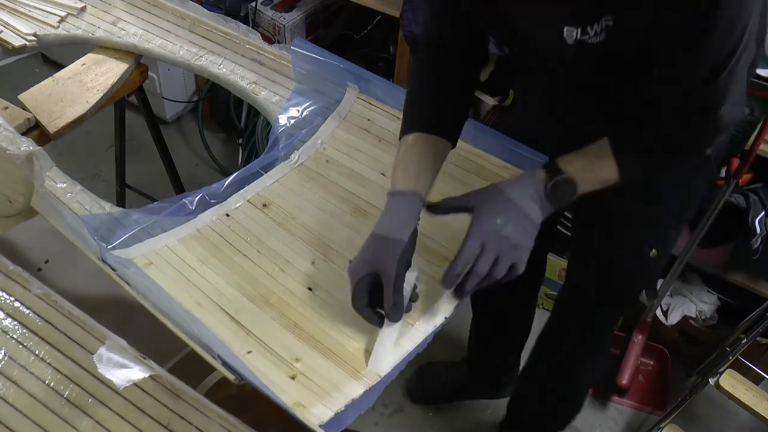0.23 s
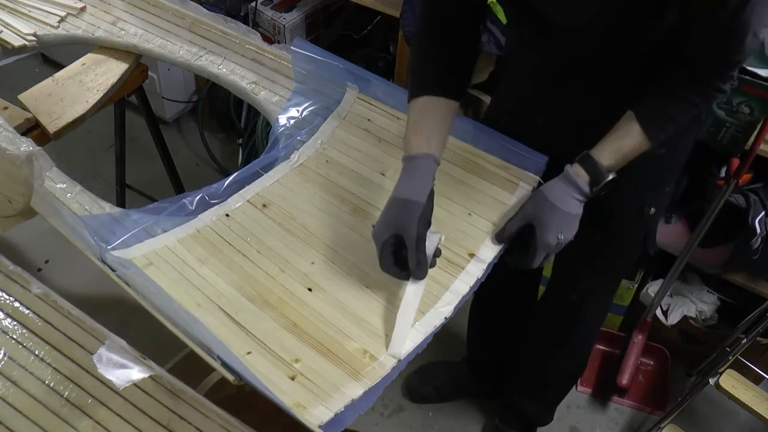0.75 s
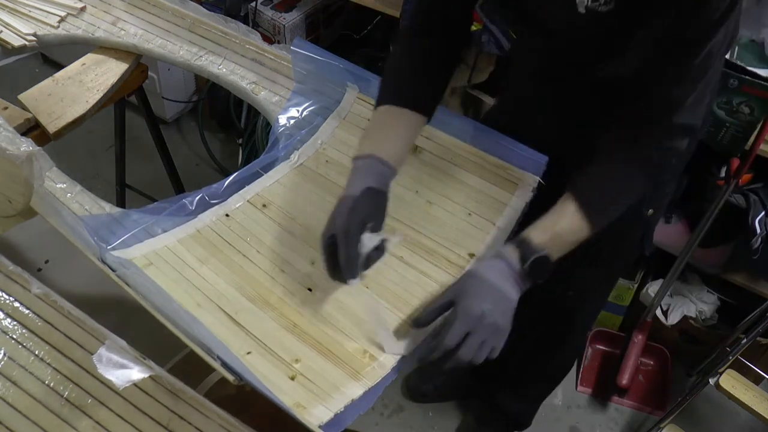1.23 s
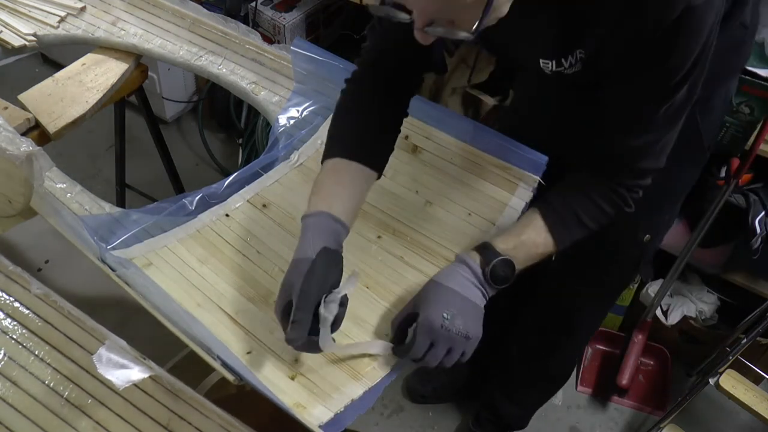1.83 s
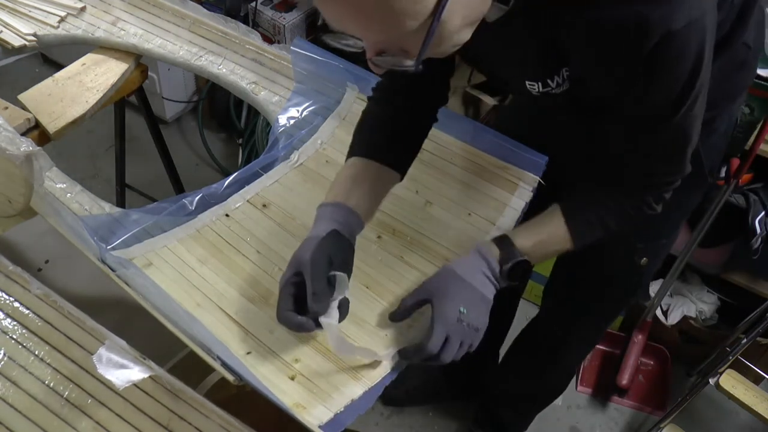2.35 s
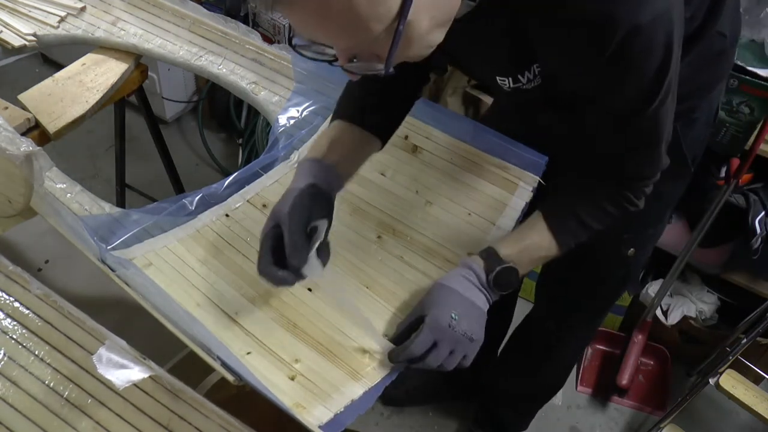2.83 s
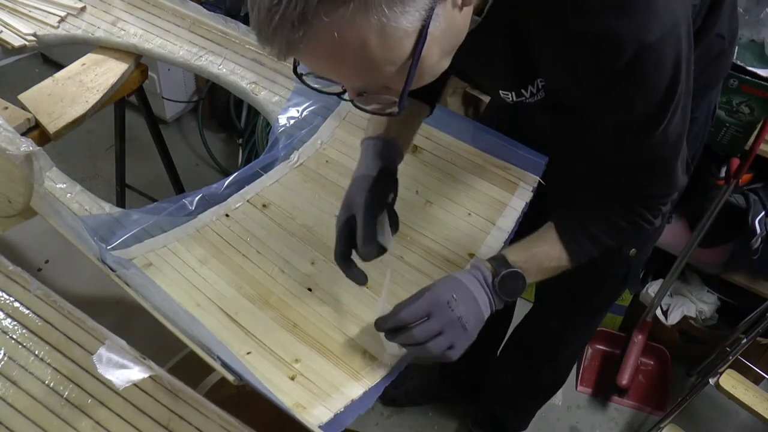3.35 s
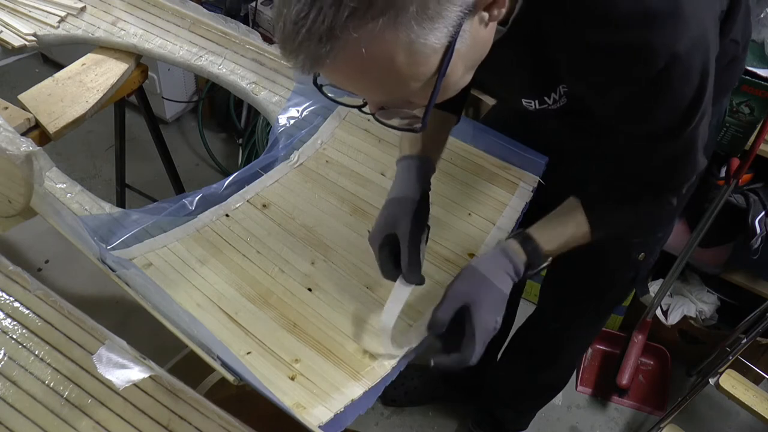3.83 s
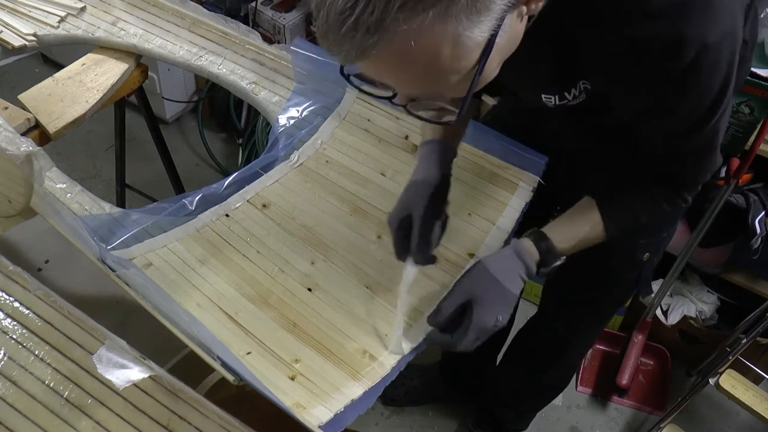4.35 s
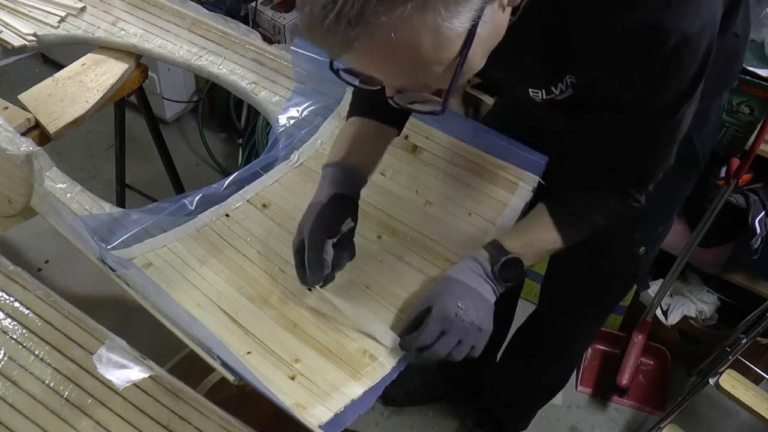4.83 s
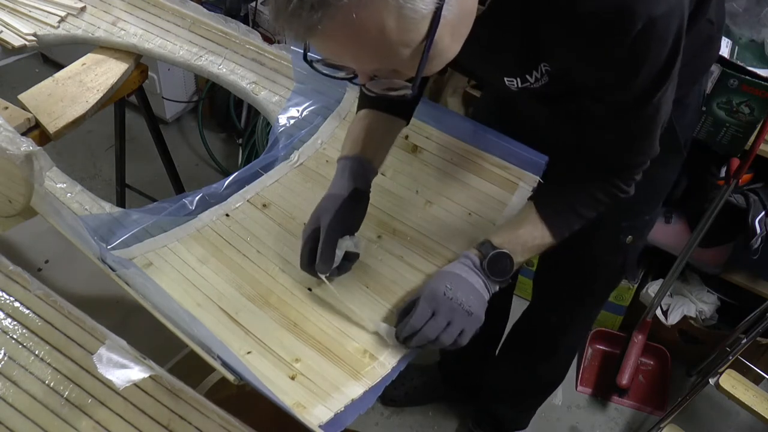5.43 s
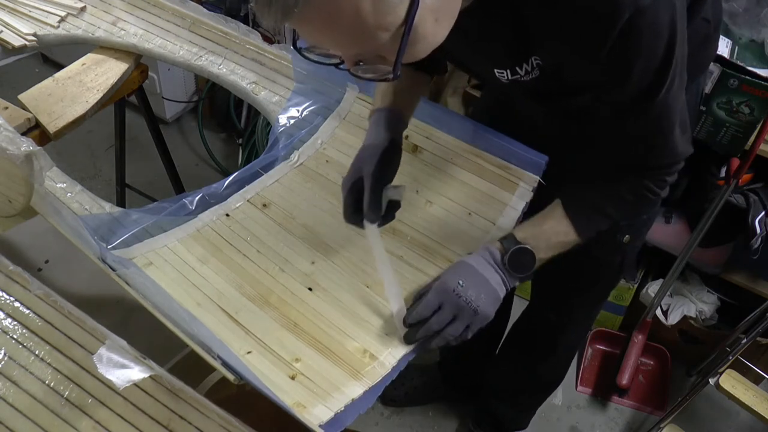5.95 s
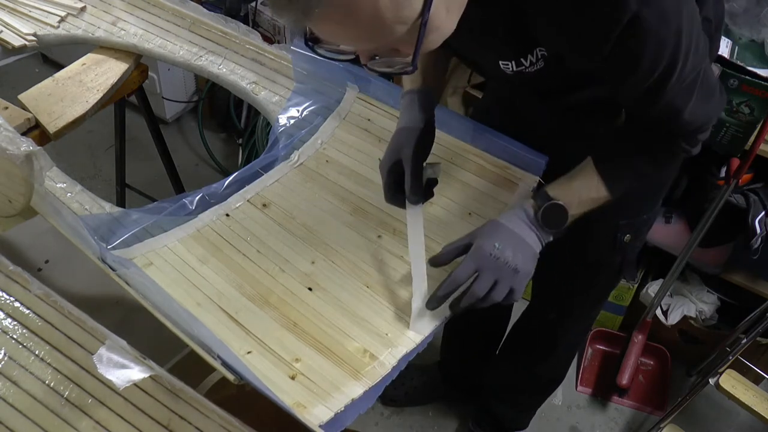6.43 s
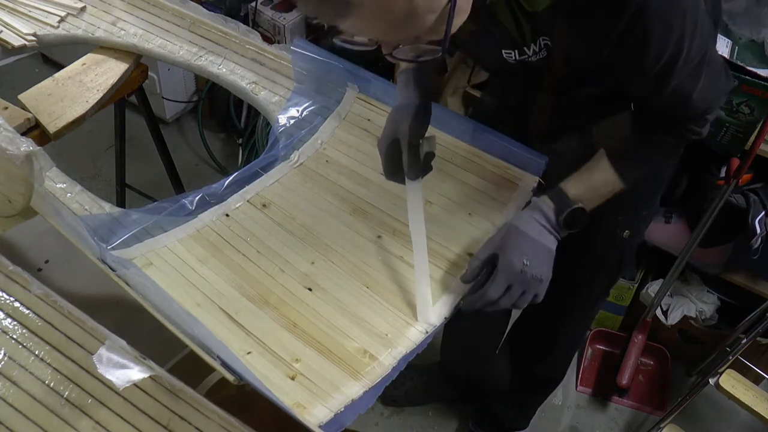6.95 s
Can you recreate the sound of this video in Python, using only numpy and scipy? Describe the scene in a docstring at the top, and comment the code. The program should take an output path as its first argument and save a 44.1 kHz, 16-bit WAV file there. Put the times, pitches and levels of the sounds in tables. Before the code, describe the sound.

Close stereo microphones catch gloved hands peeling masking tape from wood. A dense bright rip comes first, then little tugs made of tiny glue snaps, with dry crinkles and ticks. Low muffled rubs of glove on panel accompany them. There is a short lull midway, then more faint peeling and a hard, thumping snap late on. The small room dies away quickly over quiet hiss and a slowly beating low hum.

```python
"""Peeling tape off a wooden panel

Gloved hands peel masking tape off a glued panel in a small workshop: one long rip, then short pulls.
The glue lets go in a swarm of tiny random snaps; ticks of noise make the paper strip crinkle and crack.
Duller swarms are a glove rubbing the wood, and narrow bands of noise are its faint squeaks.
All of it bounces once off the panel and dies quickly in the room, over soft hiss and a faint, beating hum."""
import sys
import numpy as np
from scipy import signal
from scipy.fft import rfft, irfft
from scipy.io import wavfile
from scipy.ndimage import uniform_filter1d, map_coordinates

SR = 44100
rng = np.random.default_rng(int(sys.argv[2]) if len(sys.argv) > 2 else 0)


def int16_out(signal):
    """Quantize to a 16-bit WAV file."""
    q = np.round(np.clip(np.atleast_2d(signal).T, -1, 1) * 32767)
    wavfile.write(sys.argv[1], SR, q.astype(np.int16))


N = 317079
T = np.arange(N) / SR  # time of every sample, in seconds
FREQS = np.maximum(np.fft.rfftfreq(2 * N, 1 / SR), 1)  # in Hz, for filters on twice the length

# All source levels below are before the room.
# Pulls on the strip: start_s, rise_s, hold_s, level_db, body_db, top_db
# (body_db is the low-mid part and top_db the crisp part, both relative to level_db)
TAPE_PULLS = [(0.0, 0.0016, 0.015, -45, -20, -9.5), (0.036, 0.11, 0.12, -27, -18, -6.5),
              (0.401, 0.13, .07, -46.5, -19.5, -2), (0.692, 0.031, 0.05, -52.5, -12.5, -5),
              (0.947, 0.038, 0.021, -49, -23, -11.5), (1.193, .028, 0.0085, -39.5, -14.5, -7.5),
              (1.412, 0.029, 0.026, -52, -11.5, -10.5), (1.53, 0.0048, 0.037, -56, -23, -10.5),
              (1.635, 0.093, 0.01, -46, -23, -0.5), (1.79, .025, .03, -59, -20, -3),
              (1.889, 0.0087, 0.012, -54.5, -22, -5), (1.981, .125, 0.033, -45.5, -20, -7.5),
              (2.144, .082, .016, -40, -18, -3), (2.314, 0.023, 0.0072, -50.5, -17, -5),
              (2.414, .016, 0.019, -40, -13, -4.5), (2.786, 0.0044, 0.016, -59.5, -18, -6),
              (2.959, 0.011, .16, -64.5, -10, -10), (3.15, 0.013, 0.0054, -50, -18, -9),
              (3.341, 0.039, .011, -54, -20, -7), (3.505, 0.075, .045, -57.5, -16, -5.5),
              (3.633, 0.031, 0.0062, -50, -21, 3), (4.114, 0.0036, 0.0055, -47.5, -11.5, -4),
              (4.136, 0.033, 0.027, -50, -15, -5), (4.307, .008, 0.0044, -56, -16, -15),
              (4.553, .02, 0.071, -61, -14.5, -7.5), (4.648, 0.027, .06, -48, -13.5, -10.5),
              (4.784, 0.026, .13, -59, -19.5, -6), (5.021, 0.011, .045, -54, -23, -3),
              (5.099, 0.025, 0.011, -48.5, -20, -9), (5.193, .11, .01, -50, -19, -14.5),
              (5.383, 0.074, 0.22, -61, -11.5, -9), (5.916, 0.064, 0.0096, -59.5, -10.5, -0.5),
              (6.051, 0.19, .008, -48.5, -18, -2), (6.314, 0.078, 0.12, -53, -20, -4),
              (6.528, .006, .014, -45, -9.5, -1.5), (6.8, 0.026, .08, -64, -17.5, -5),
              (6.994, 0.0039, .19, -50, -17.5, 1)]
# Faint rustle of the slack strip between pulls: level_db, body_db, top_db (the last two relative)
SLACK_RUSTLE = (-66, -12, -11)
# Sound colour of the tape: freq_hz, density_db
TAPE_SPECTRUM = [(200, -21), (400, -27), (750, -15), (1200, -12), (1700, -2), (2400, 3), (4000, -2),
                 (7300, -3), (10000, -8.5), (13000, -18), (15800, -26)]
# Sound colour of the strip jerking free of a glued spot: freq_hz, density_db
JERK_SPECTRUM = [(40, -5), (90, -5.5), (170, 0.5), (400, -29), (750, -13), (1200, -8), (2200, 5),
                 (3600, -1), (6000, -2), (8100, -10), (11000, -6), (15800, -38)]
# Single cracks of paper and dried glue: start_s, peak_db, centre_hz
PAPER_CRACKS = [(0.0505, -20, 4300), (0.5527, -16, 4300), (0.7573, -30, 3900), (1.2191, -19, 4100),
                (1.3473, -36, 2500), (1.5419, -30, 3900), (2.0166, -28, 5700), (2.159, -27, 4000),
                (2.207, -21, 6200), (2.4368, -19, 4700), (2.4464, -20, 5600), (3.032, -37, 1900),
                (3.1633, -30, 5000), (3.3784, -32, 3800), (3.4155, -33, 4100), (3.5866, -32, 3200),
                (3.6653, -27, 7000), (3.6814, -25, 7400), (3.7602, -37, 6300), (4.1202, -28, 2600),
                (4.1809, -27, 6200), (4.189, -25, 4300), (4.2052, -29, 4700), (4.6568, -28, 3200),
                (4.6832, -12, 6200), (4.7064, -24, 3300), (4.7632, -28, 3900), (4.8465, -32, 3000),
                (5.1374, -23, 4100), (5.1452, -31, 3300), (5.3299, -34, 3500), (5.7705, -24, 4300),
                (6.0057, -31, 4800), (6.1586, -27, 3700), (6.2181, -31, 4900), (6.244, -23, 4400),
                (6.293, -30, 5200), (6.3941, -31, 5200), (6.6784, -36, 5400), (6.9701, -34, 2800),
                (7.0035, -28, 3400), (7.0287, -22, 9600), (7.067, -25, 5100), (7.1136, -21, 6500),
                (7.1176, -21, 8200), (7.1263, -24, 6800)]
# Strokes of glove and sleeve on the panel: start_s, rise_s, hold_s, level_db
GLOVE_RUBS = [(0.0, 0.05, 0.16, -50.5), (0.336, .05, 0.18, -53.5), (.63, 0.019, 0.1, -60),
              (1.186, 0.023, .006, -68), (1.386, 0.059, 0.016, -58), (1.686, 0.067, 0.027, -59.5),
              (2.02, 0.053, .09, -65.5), (2.187, 0.035, 0.029, -58.5), (2.422, 0.013, .006, -52.5),
              (2.62, .03, 0.11, -65.5), (3.54, 0.055, 0.094, -69.5), (4.118, 0.045, .05, -59.5),
              (4.662, .07, .02, -59.5), (5.452, 0.093, .12, -66), (6.188, 0.047, 0.3, -67),
              (6.522, .01, .01, -56.5), (6.942, 0.065, .16, -61.5)]
# Sound colour of the rubbing: freq_hz, density_db
RUB_SPECTRUM = [(50, -33), (90, 5), (145, 6.5), (200, -8), (300, 4.5), (420, 1.5), (600, -12), (1000, -16),
                (2000, -49)]
# The glove catches on the wood: middle_s, length_s, pitch_hz, level_db
GLOVE_SQUEAKS = [(4.17, 0.044, 754, -67.5), (5.63, 0.048, 740, -73)]
# Resonances and dips of the panel and its surroundings: centre_hz, width_hz, gain_db
PANEL_RESONANCES = [(554, 30, 6), (771, 146, 11), (914, 46, -15.5), (1440, 42, 3.5), (1553, 88, -6.5),
                    (1808, 83, 4), (2390, 600, -3.5), (3880, 120, 0)]
# Stereo width: freq_hz, side_minus_mid_db
STEREO_WIDTH = [(60, -17), (200, -11), (400, -12), (750, -15), (1300, -18), (2400, -19), (4400, -22),
                (8100, -19), (15000, -29)]
# Sound colour of the workshop hiss: freq_hz, density_db
HISS_SPECTRUM = [(30, -28), (60, -22), (130, -16), (330, -18), (600, -25), (1050, -32), (2300, -19),
                 (5000, -28), (10000, -32), (15800, -38)]

REST_FROM_S, REST_TO_S = 3.76, 4.11  # the strip hangs still
PULL_FADE_DB_PER_S, LONG_PULL_S = 268.5, 0.28  # a pull of LONG_PULL_S fades half as fast
RUB_FADE_DB_PER_S = 107
BOUNCE_S, BOUNCE_DB = 0.0041, -6.5  # level relative to the direct sound
ROOM_DB = -3.5  # relative to the direct sound
ROOM_T60_S, ROOM_TOP_T60_S = 0.3, 0.25  # time to fade by 60 dB: lower part, treble
HISS_DB = -65
TOP_HZ = 15800


def tape(per_s=3400, gentle_db=-58, speed_law=0.65, spread_db=4.0, judder_db=2.5, judder_rate_hz=170):
    """Threads of glue snap one by one; a faster pull is louder and merges them into a dense rip."""
    level, body, top = peeling()
    # at the gentle level the speed is 1, with per_s snaps a second
    speed = (level / undb(gentle_db)) ** speed_law
    # a slow peel sticks and slips, so the snaps come in clumps; a fast one runs evenly
    judder = judder_db * walk(judder_rate_hz) / np.sqrt(np.maximum(speed, 1))
    swarm = snaps(per_s * speed, spread_db) * undb(judder)
    paper = colour(TAPE_SPECTRUM)
    low = 1 / (1 + (FREQS / 1600) ** 5)
    high = 1 / (1 + (7200 / FREQS) ** 7)
    middle = 1 - low - high
    # each pull has its own share of low body, mid rasp and crisp top
    low_body = shape(swarm * body, unit(paper * low, 700, 1550))
    rasp = shape(swarm * level, unit(paper * middle, 2500, 7500))
    crisp = shape(swarm * top, unit(paper * high, 7500, 15000))
    return low_body + rasp + crisp


def peeling():
    """Amplitudes of the strip's rasp, body and top: the pulls add their power to the slack rustle."""
    db, body_db, top_db = SLACK_RUSTLE
    moving = (T < REST_FROM_S) | (T > REST_TO_S)
    power = np.outer(undb([db, db + body_db, db + top_db]) ** 2, moving)
    for start_s, rise_s, hold_s, db, body_db, top_db in TAPE_PULLS:
        # a quick tug stops fast, a long pull fades more slowly
        fade_db_per_s = PULL_FADE_DB_PER_S / (1 + (rise_s + hold_s) / LONG_PULL_S)
        pull = stroke(start_s, rise_s, hold_s, fade_db_per_s)
        power += np.outer(undb([db, db + body_db, db + top_db]) ** 2, pull ** 2)
    return np.sqrt(power)


def jerk(at_s=6.5323, level_db=-22.0, tear_s=0.0013, fade_s=0.00039, size=256):
    """The glued spot tears through in a millisecond or two: a loud snap that also thumps the panel."""
    t = np.arange(size) / SR
    fibres = rng.choice([-1, 1], size) * np.exp(-np.maximum(t - tear_s, 0) / fade_s)
    snap = shape(np.pad(fibres, (0, N - size)), causal(colour(JERK_SPECTRUM)))
    # the level is the rms over the first size samples
    snap *= undb(level_db) / np.sqrt(np.mean(snap[:size] ** 2))
    return np.pad(snap, (int(at_s * SR), 0))[:N]


def cracks(size=256):
    """A crease buckles or a bead of glue breaks: a sharp tick with a gritty tail, coloured by the paper."""
    out = np.zeros(N + size)
    t = np.arange(size) / SR
    paper = irfft(causal(colour(TAPE_SPECTRUM)))[:size]
    grit = 0.18 * np.exp(-t / 0.0006)
    noises = rng.standard_normal((len(PAPER_CRACKS), size))
    for (start_s, peak_db, centre_hz), noise in zip(PAPER_CRACKS, noises):
        push = grit * noise
        push[0] = 1  # the sharp tick
        # small creases sound higher than large ones
        edges_hz = [centre_hz / 1.8, min(centre_hz * 1.9, SR / 2.3)]
        band = signal.butter(2, edges_hz, "band", fs=SR)
        crack = signal.lfilter(*band, np.convolve(push, paper)[:size])
        i = int(start_s * SR)
        out[i:i + size] += undb(peak_db) * crack / np.abs(crack).max()
    return out[:N]


def glove(per_s=900, spread_db=5.0):
    """The steadying hand drags over the wood in small dull slips."""
    power = np.zeros(N)
    for start_s, rise_s, hold_s, level_db in GLOVE_RUBS:
        power += (undb(level_db) * stroke(start_s, rise_s, hold_s, RUB_FADE_DB_PER_S)) ** 2
    slips = snaps(per_s, spread_db) * np.sqrt(power)
    return shape(slips, unit(colour(RUB_SPECTRUM), 126, 610))


def squeaks(wide_hz=45):
    """Rubber grips the wood for a moment and sings faintly on one narrow resonance."""
    out = np.zeros(N)
    for middle_s, length_s, pitch_hz, level_db in GLOVE_SQUEAKS:
        ring = unit(1 / (1 + (2 * (FREQS - pitch_hz) / wide_hz) ** 2), 0, SR)
        swell = np.exp(-((T - middle_s) / length_s) ** 2)
        out += shape(rng.standard_normal(N), ring) * undb(level_db) * swell
    return out


def workshop(x, sway_s=0.000247, order=6):
    """Direct sound, a bounce off the panel and a short tail; the reflections shift as the hands move."""
    wood_db = sum(db / (1 + (2 * (FREQS - hz) / wide) ** 2) for hz, wide, db in PANEL_RESONANCES)
    x = shape(x, causal(undb(wood_db)))
    # several reflection patterns trade places at random, with constant total power
    shares = np.array([walk(20) for _ in range(order)])
    shares /= np.linalg.norm(shares, axis=0)
    tail = sum(share * diffuse(x) for share in shares)
    bounce_delay_s = BOUNCE_S + sway_s * walk(2)
    bounce = map_coordinates(x, [(T - bounce_delay_s) * SR], order=3)
    mid = x + undb(BOUNCE_DB) * bounce + undb(ROOM_DB) * tail
    mid /= np.sqrt(1 + undb(BOUNCE_DB) ** 2 + undb(ROOM_DB) ** 2)
    # the two close microphones differ a little in phase and in the reflections they catch
    turned = shape(x, 1j)  # a quarter-cycle phase turn
    side = shape(turned + diffuse(x), colour(STEREO_WIDTH) / np.sqrt(2))
    return np.array([mid + side, mid - side])


def diffuse(x, build_s=0.00039, split_hz=5000):
    """One random pattern of wall reflections, with unit energy; the treble dies first."""
    t = T[:SR // 2]
    noise = rng.standard_normal(len(t))
    dull = signal.lfilter(*signal.butter(1, split_hz, fs=SR), noise)
    bright = noise - dull
    tail = dull * undb(-60 * t / ROOM_T60_S) + bright * undb(-60 * t / ROOM_TOP_T60_S)
    tail *= 1 - np.exp(-t / build_s)
    return signal.fftconvolve(x, tail / np.sqrt(np.sum(tail ** 2)))[:N]


def room_tone():
    """Soft steady hiss of the workshop: coloured noise, partly different left and right."""
    mid, side = shape(rng.standard_normal((2, N)), unit(colour(HISS_SPECTRUM), 160, 16000))
    side = shape(side, colour(STEREO_WIDTH))
    return undb(HISS_DB) * np.array([mid + side, mid - side])


def hum(mains_db=-75, buzz_db=-70.5, motor_db=-72.5, beat_hz=1.0, lull_s=3.55):
    """Mains hum; a motor runs just off its second harmonic, so the two beat about once a second."""
    phase = 2 * np.pi * (50 * T + rng.random())
    slip = 2 * np.pi * beat_hz * (T - lull_s)
    mains = undb(mains_db) * np.sin(phase)
    buzz = undb(buzz_db) * np.sin(2 * phase)
    motor = -undb(motor_db) * np.sin(2 * phase - slip)  # opposes the buzz most at lull_s
    return np.sqrt(2) * (mains + buzz + motor)  # levels are rms


def stroke(start_s, rise_s, hold_s, fade_db_per_s):
    """One move of a hand: it gathers speed evenly, holds it, then dies away."""
    rise = np.clip((T - start_s) / max(rise_s, 1e-3), 0, 1)
    fading_s = np.clip(T - start_s - rise_s - hold_s, 0, 1)
    return rise * undb(-fade_db_per_s * fading_s)


def snaps(per_s, spread_db, span=4.42):
    """A swarm of impulses, most small and a few large, with mean power 1."""
    chance = np.clip(per_s / SR, 1e-4, 1)  # of a snap on each sample
    size_db = spread_db * np.minimum(rng.exponential(size=N), span)
    size = undb(size_db) * rng.choice([-1, 1], N)
    return (rng.random(N) < chance) * size / np.sqrt(chance * np.mean(size ** 2))


def walk(rate_hz):
    """Random levels, each held for 1 / rate_hz seconds, then smoothed twice; spread 1."""
    k = max(int(SR / rate_hz), 1)
    held = np.repeat(rng.standard_normal(N // k + 1), k)[:N]
    smooth = uniform_filter1d(uniform_filter1d(held, k), k)
    return smooth / smooth.std()


def undb(db):
    """Decibels to gain."""
    return 10 ** (np.asarray(db) / 20)


def colour(points):
    """Gain on FREQS of a spectrum drawn through points of freq_hz, level_db."""
    hz, db = np.transpose(points)
    return undb(np.interp(np.log(FREQS), np.log(hz), db))


def unit(gain, lo_hz, hi_hz):
    """Scale a filter so that white noise leaves it with rms 1 inside a band."""
    in_band = (FREQS > lo_hz) & (FREQS < hi_hz)
    return gain / np.sqrt(np.mean(gain ** 2 * in_band))


def shape(x, gain):
    """Filter by a gain given on FREQS."""
    return irfft(rfft(x, 2 * N) * gain)[..., :N]


def causal(gain):
    """The minimum-phase response with this gain: it rings only after the blow."""
    cepstrum = irfft(np.log(gain + 1e-6))
    # fold the backward half of time onto the forward half
    cepstrum[1:N] *= 2
    cepstrum[N + 1:] = 0
    return np.exp(rfft(cepstrum))


def scene():
    """Tape, cracks and glove in the room, over hiss and hum."""
    sources = tape() + jerk() + cracks() + glove() + squeaks()
    return workshop(sources) + room_tone() + hum()


def record(dry):
    """A steep low-pass filter removes the treble above TOP_HZ."""
    low_pass = signal.ellip(10, 0.1, 80, TOP_HZ, fs=SR, output="sos")
    return signal.sosfilt(low_pass, dry)


dry = scene()
out = record(dry)
int16_out(out)
```